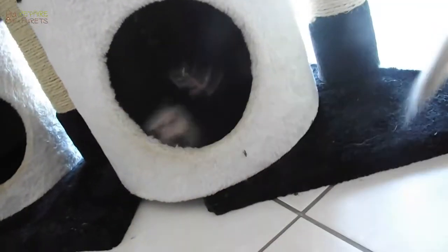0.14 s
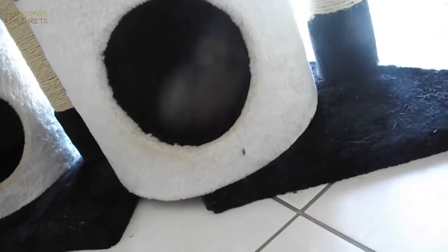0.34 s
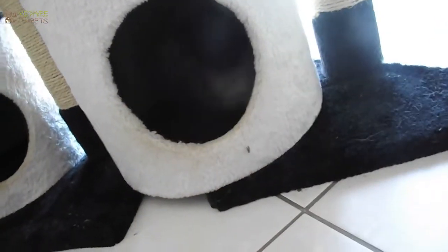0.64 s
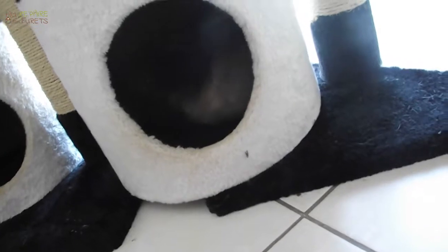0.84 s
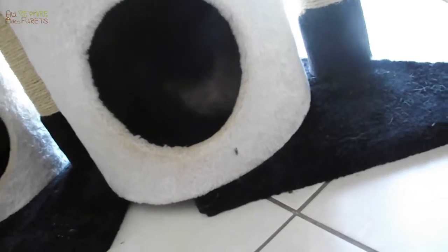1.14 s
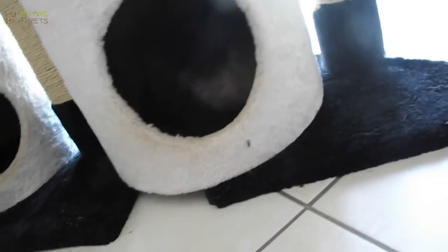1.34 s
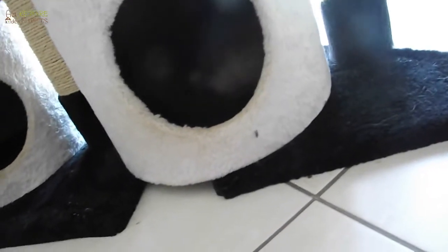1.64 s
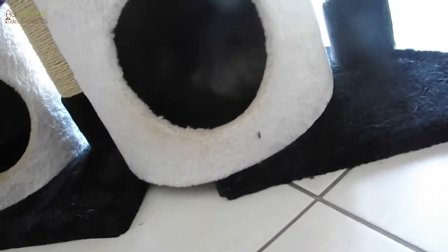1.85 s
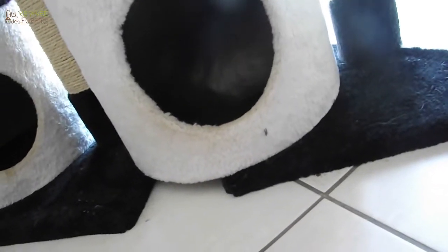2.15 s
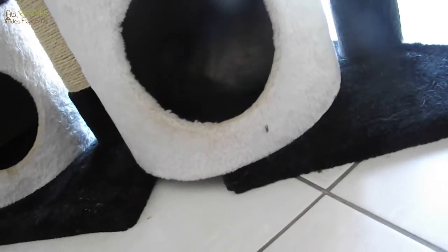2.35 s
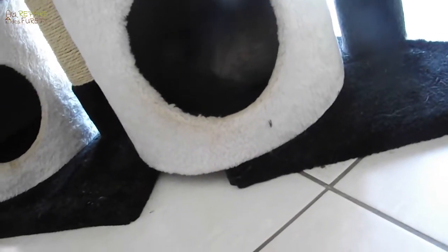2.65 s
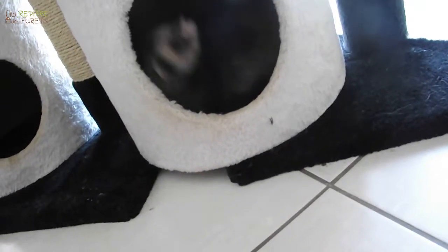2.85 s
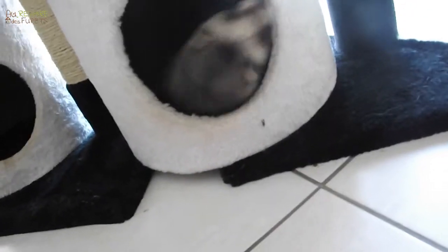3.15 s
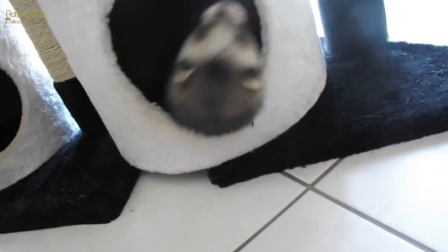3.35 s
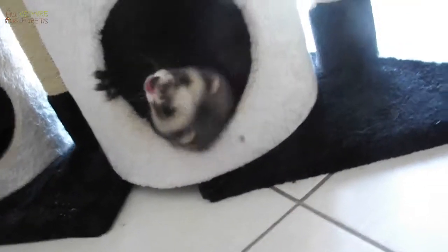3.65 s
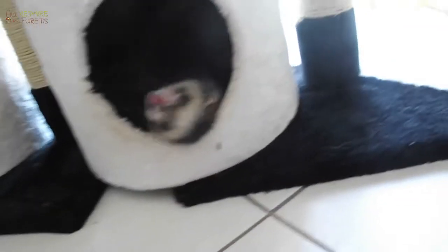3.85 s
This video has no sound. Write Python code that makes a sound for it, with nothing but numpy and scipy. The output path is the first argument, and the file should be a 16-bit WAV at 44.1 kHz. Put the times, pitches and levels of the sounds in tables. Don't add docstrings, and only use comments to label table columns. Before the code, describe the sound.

Ferret claws rake carpet inside a hollow cubby near the microphone: an early scratch, dull scuffs and small bumps, one sharp scratch, a quiet stretch, then a loud cluster of scrabbling in a hard tiled room.

```python
import sys
import numpy as np
from scipy import signal
from scipy.fft import rfft, irfft, next_fast_len
from scipy.io import wavfile
from scipy.ndimage import uniform_filter1d, map_coordinates

SR = 44100
rng = np.random.default_rng(int(sys.argv[2]) if len(sys.argv) > 2 else 0)


def unload_audio(sound):
    columns = np.transpose(np.atleast_2d(sound))
    steps = np.round(np.clip(columns, -1, 1) * 32767)
    wavfile.write(sys.argv[1], SR, steps.astype(np.int16))


def boost_factor(decibels):
    exponent = np.asarray(decibels, float) / 20
    return 10 ** exponent


N = 176400

# (time [s], peak level [dB], pitch [Hz], treble [dB], length [s])
CLAW_RAKES = [(0.177, -24, 1830, -21, 0.024), (0.218, -13, 2950, -16.5, 0.051),
              (1.46, -8, 2584, -11.5, 0.03), (3.255, -13.5, 1410, -55, 0.013),
              (3.269, -13, 2866, -31, 0.014), (3.433, -13, 1430, -29, 0.013),
              (3.439, -15.5, 2900, -26.5, 0.025), (3.548, -5.5, 1436, -26, 0.025),
              (3.565, -8, 2865, -33, 0.026), (3.811, -10, 2178, -31, .016), (3.842, -4.5, 2554, -22, 0.011),
              (3.853, -5.5, 3105, -14.5, 0.023), (3.874, -11.5, 2880, -11, 0.022),
              (3.976, -7.5, 2800, -26.5, 0.011)]
# (time [s], peak level [dB], pitch [Hz], length [s])
DULL_SCUFFS = [(0.158, -41, 1780, 0.014), (0.521, -34, 1110, 0.023), (0.625, -35.5, 850, 0.023),
               (0.717, -38.5, 1036, 0.024), (0.818, -37.5, 1000, 0.024), (0.897, -34, 1140, 0.021),
               (0.964, -35.5, 1170, 0.11), (1.105, -49.5, 1205, 0.013), (1.448, -29.5, 1445, 0.04),
               (1.762, -34, 1120, 0.029), (2.077, -35.5, 1253, .035), (2.806, -38.5, 1320, 0.056),
               (2.923, -37, 1610, 0.016), (3.034, -31.5, 1170, 0.073), (3.077, -21.5, 2580, 0.016),
               (3.238, -31.5, 1700, 0.016)]
# (pitch [Hz], width [Hz], level [dB])
CARPET_SHELL = [(583, 390, -8.5), (1575, 377, 1.5), (2910, 334, 5.5), (4200, 960, -31)]
# (pitch [Hz], width [Hz], level [dB])
RAKE_SHEEN = [(4200, 1200, 1.5), (6100, 940, 1), (7650, 1240, 1.5), (9390, 690, -1.5)]
# (frequency [Hz], level [dB per Hz])
SCRATCH_TONE = [(3000, -26), (4200, 13), (5500, 7), (7500, 4), (9500, 0), (11500, -22.5), (16000, -68.5)]
# (time [s], peak level [dB], pitch [Hz])
CLAW_TIPS = [(0.2295, -24, 2900), (0.2359, -18, 2584), (0.241, -22.5, 3000), (0.2453, -19, 2560),
             (0.2531, -20.5, 2920), (0.2578, -19, 2920), (0.264, -21, 2650), (1.4627, -22.5, 2770),
             (1.4695, -20.5, 2790), (1.4744, -21.5, 2080), (1.478, -16.5, 3100), (1.4835, -26, 2790),
             (3.0853, -23, 2450), (3.2592, -17, 1510), (3.266, -24, 1285), (3.2733, -21, 2840),
             (3.2813, -24.5, 2990), (3.4349, -17, 1457), (3.4392, -22.5, 1343), (3.4478, -17, 1277),
             (3.4599, -30.5, 1330), (3.4703, -31, 1540), (3.5497, -19.5, 1378), (3.5576, -13.5, 1460),
             (3.5656, -15, 1480), (3.5683, -15, 1503), (3.579, -18, 2850), (3.5819, -17.5, 1730),
             (3.8153, -22.5, 2300), (3.8216, -23.5, 2230), (3.8491, -7, 2490), (3.858, -12.5, 3176),
             (3.8615, -12.5, 3170), (3.8697, -15, 2300), (3.8877, -18, 2990), (3.98, -13, 3090),
             (3.9862, -21, 2970)]
# (time [s], peak level [dB], pitch [Hz])
SINGLE_TOES = [(0.5301, -42, 830), (0.5372, -41, 915), (0.6269, -33, 860), (0.6331, -35.5, 726),
               (0.6409, -31.5, 944), (0.726, -38.5, 880), (0.7328, -34.5, 1056), (0.8333, -43, 840),
               (0.8425, -36.5, 1100), (0.9054, -39.5, 1010), (0.9107, -44, 1080), (0.9462, -35.5, 802),
               (1.7709, -35, 1017), (1.7837, -34, 1150), (2.935, -30, 1620)]
# (time [s], peak level [dB])
FIBRE_TICKS = [(0.0285, -49.5), (0.0383, -60), (0.0618, -49), (0.0962, -58), (0.1234, -57.5),
               (0.1443, -70.5), (0.1585, -64), (0.3191, -52.5), (0.3502, -53), (0.3627, -58), (0.397, -61),
               (0.4282, -44), (2.525, -58.5), (2.895, -67), (2.9342, -54), (3.7313, -39), (3.9778, -33.5)]
# (time [s], peak level [dB], pitch [Hz])
PAW_THUMPS = [(0.036, -29.5, 338), (0.095, -36.5, 365), (0.178, -40.5, 217), (0.246, -38.5, 596),
              (0.32, -45.5, 178), (0.534, -45, 442), (0.625, -30.5, 347), (0.729, -40, 282),
              (0.828, -39, 325), (0.898, -40, 300), (1.476, -30.5, 189), (1.768, -45.5, 164.4),
              (1.878, -33.5, 197), (1.925, -43, 650), (2.0, -47, 593), (2.686, -57, 687), (2.931, -40, 185),
              (3.263, -31.5, 238), (3.445, -33.5, 216), (3.547, -22, 690), (3.657, -31, 340),
              (3.747, -35.5, 341), (3.813, -22.5, 339.4), (3.887, -28.5, 600)]
# (time [s], peak level [dB], pitch [Hz])
MORE_THUMPS = [
    (0.102, -43.5, 62.7),
    (3.591, -38.5, 157),
]
# (time [s], level [dB])
FLANK_RUB = [
    (3.59, -36.5),
    (3.65, -32),
    (3.69, -35.5),
    (3.72, -44),
    (3.79, -48),
]
# (frequency [Hz], level [dB per Hz])
FUR_TONE = [(400, -11.5), (1300, -13), (2800, -1.5), (4500, -13), (7500, -27), (9800, -31), (12500, -95)]
# (time [s], peak level [dB], width [s], treble [dB], direction [+1 or -1])
CAMERA_KNOCKS = [
    (0.5237, -28, 0.00091, -26, 1),
    (0.6287, -27.5, 0.0006, -49, 1),
    (0.9527, -26.5, 0.0014, -23, -1),
]
# (frequency [Hz], level [dB per Hz])
AIR_TONE = [(3500, -43), (4800, 3), (6600, -17), (8500, 3.5), (11000, -4), (13000, -37)]
# (time [s], peak level [dB], pitch [Hz], length [s])
FIBRE_SQUEAKS = [(0.11, -55, 4540, .008), (0.111, -38.5, 2980, .01), (.235, -26, 4120, .03),
                 (0.423, -44.5, 6650, 0.005), (1.009, -36.5, 4200, 0.019), (1.058, -49, 3124, 0.037),
                 (1.798, -33, 3510, .035), (1.875, -42.5, 4200, 0.017), (2.084, -45, 4230, 0.012),
                 (2.078, -39.5, 2406, .03), (2.205, -57.5, 4200, .03), (2.31, -47.5, 4700, 0.099),
                 (2.518, -54, 4900, 0.018), (2.704, -64, 5070, 0.022), (2.826, -31, 3300, 0.013),
                 (2.833, -45.5, 3820, .012), (2.924, -47.5, 4200, .01), (3.089, -31.5, 2980, .012),
                 (3.716, -33, 3257, 0.015)]
# (time [s], peak level [dB], pitch [Hz])
FAR_TAPS = [
    (2.207, -49, 1190),
    (2.402, -58, 1250),
    (2.505, -43.5, 1754),
    (2.62, -51.5, 1700),
    (2.6974, -50, 1760),
]
# (time [s], pitch [Hz], level [dB])
POST_CREAKS = [
    [(2.09, 561, -60.5), (2.19, 583, -54.5), (2.275, 570, -70.5), (2.31, 573, -54.5), (2.365, 567, -70),
     (2.39, 560, -53), (2.42, 542, -76), (2.46, 531, -58.5), (2.53, 527, -90)],
    [(2.74, 563, -84), (2.85, 530, -58), (2.97, 564, -64)],
]
# (time [s], rustle level [dB], fizz level [dB], rumble level [dB])
FLOOR_STIR = [(0, -50.5, -57.5, -59.5), (.2, -59.5, -76.5, -53), (.45, -64, -85, -79),
              (1.0, -58, -117.5, -65), (1.3, -87.5, -100, -78.5), (1.6, -60, -75.5, -60.5),
              (2.0, -61.5, -79, -62), (2.5, -75, -84.5, -65), (3.0, -65, -72, -55.5),
              (3.45, -47, -61.5, -56.5), (4.0, -44.5, -47.5, -61.5)]
# (frequency [Hz], level [dB per Hz])
RUSTLE_TONE = [(80, -42.5), (170, 1), (420, -14.5), (600, -0.5), (950, -22.5), (1400, -7.5), (2600, -1.5),
               (3700, -45.5)]
# (frequency [Hz], level [dB per Hz])
FIZZ_TONE = [(2300, -52), (3200, -1), (4600, -16.5), (5600, -46.5), (11000, -82.5)]
# (frequency [Hz], level [dB per Hz])
RUMBLE_TONE = [(15, 5), (30, 5.5), (64, -1), (100, -16), (300, -110)]
# (frequency [Hz], time to fall 60 dB [s])
ROOM_RING = [(150, 0.46), (600, 0.34), (2500, 0.41), (6000, 0.42), (12000, 0.22)]
# (pitch [Hz], level [dB])
CAMERA_WHINE = [(15692, -90)]

ROOM_DB, BODY_DB, HISS_DB = -10.5, 6.5, -102
AIR_DB, AIR_T60_S = -22, 0.38
FLICKER_HZ = 59.94


def claws():
    shell, sheen = resonant(CARPET_SHELL), resonant(RAKE_SHEEN)
    s, db, hz, treble_db, length = np.transpose(CLAW_RAKES)
    ring = grains(s, db - 10.5, hz, length, spread=0.075, cycles=6.06, scatter_db=0, count=12, peak=0.23)
    scratch = snaps(s, db + treble_db - 11, 1.3 * length, count=400)
    bright = filtered(scratch, lambda f: boost_factor(along(SCRATCH_TONE, f)) * sheen(f))
    body = snaps(s, db + BODY_DB - 5.5, length, count=90)
    hard = filtered(body, lambda f: shell(f) / (1 + (f / 4800) ** 6))

    s, db, hz, length = np.transpose(DULL_SCUFFS)
    dull = filtered(snaps(s, db + 1.5, length, count=40), shell)
    dull = dull + grains(s, db - 3.5, hz, length, spread=0.11, cycles=5.0, scatter_db=3, count=12)
    muffled = filtered(dull, lambda f: 1 / (1 + (f / 2900) ** 10))
    return ring + hard + bright + muffled


def catches():
    s, db, hz = np.transpose(CLAW_TIPS)
    tips = grains(s, db + 8, hz, 0, spread=0, cycles=4.15, scatter_db=-1, count=1, peak=.001)
    s, db, hz = np.transpose(SINGLE_TOES)
    toes = grains(s, db + 8, hz, 0, spread=0, cycles=2.03, scatter_db=0.5, count=1, peak=.001)
    s, db = np.transpose(FIBRE_TICKS)
    ticks = snaps(s, db + 8, np.full(len(s), .0015), count=6)
    return tips + toes + filtered(ticks, resonant([(3300, 1200, -2), (6600, 2600, -0.5)]))


def paws():
    s, db, hz = np.transpose(list(PAW_THUMPS) + list(MORE_THUMPS))
    return grains(s, db + 3.5, hz, 0.01551, spread=0.053, cycles=1.87, scatter_db=0.0, count=4, peak=0.065)


def rub():
    db, = curves(FLANK_RUB)
    gate = fade_gate(3.57, 3.81, 0.028)
    grain_db = 3 * wobble(60) + 3.5 * wobble(300)
    return gate * boost_factor(db - 4 + grain_db) * rush(FUR_TONE, patchy_db=3)


def knocks():
    t, x = np.arange(N) / SR, np.zeros(N)
    scratch, air = rush(SCRATCH_TONE, patchy_db=0), rush(AIR_TONE, patchy_db=1)
    for s, db, width, treble_db, direction in CAMERA_KNOCKS:
        d = t - s
        away = np.abs(d)
        push = 1.26 * np.sign(direction) * np.tanh(d / 0.00016) * np.exp(-away / width)
        sway = 0.046 * np.sin(2 * np.pi * 55 * d) * (d > 0) * np.exp(-away / 0.037)
        x += boost_factor(db) * (push + sway)
        x += boost_factor(db + treble_db - 10) * scratch * np.exp(-away / 0.00091)
        x += boost_factor(db + treble_db + AIR_DB - 60 * away / AIR_T60_S) * air * (d > -.008)
    return x


def squeaks():
    s, db, hz, length = np.transpose(FIBRE_SQUEAKS)
    high = grains(s, db - 9, hz, 1.5 * length, spread=.03, cycles=15, scatter_db=3, count=30, peak=.4)
    s, db, hz = np.transpose(FAR_TAPS)
    return high + grains(s, db - 6, hz, .05, spread=.03, cycles=12, scatter_db=3, count=8)


def creak():
    x = np.zeros(N)
    for rows in POST_CREAKS:
        hz, db = curves(rows)
        gate = fade_gate(rows[0][0], rows[-1][0], .02)
        unsteady = 1.1 + .45 * wobble(35) + .45j * wobble(35)
        turning = np.exp(2j * np.pi * np.cumsum(hz) / SR)
        x += gate * boost_factor(db) * np.real(unsteady * turning)
    return x


def room(x):
    out, step = np.zeros(N + 2 * SR), SR // 4
    for a in range(0, N, step):
        hz, t, z = signal.stft(rng.standard_normal(SR), SR, nperseg=256)
        fade = boost_factor(-60 * t / along(ROOM_RING, hz)[:, None])
        tail = signal.istft(z * fade, SR, nperseg=256)[1][:SR]
        wet = signal.fftconvolve(x[a:a + step], tail / np.linalg.norm(tail))
        out[a + 300:][:len(wet)] += wet
    return out[:N]


def floor():
    rustle_db, fizz_db, rumble_db = curves(FLOOR_STIR)
    rustle = boost_factor(rustle_db + 1.5 * wobble(14)) * rush(RUSTLE_TONE, patchy_db=3)
    fizz = boost_factor(fizz_db + 2.5 * wobble(14) + 3 * wobble(150)) * rush(FIZZ_TONE, patchy_db=3)
    rumble = boost_factor(rumble_db + 3.5 * wobble(10)) * rush(RUMBLE_TONE, patchy_db=0)
    return rustle + fizz + rumble + boost_factor(HISS_DB) * rng.standard_normal(N)


def whine():
    (hz, db), = CAMERA_WHINE
    t = np.arange(N) / SR
    frame = (t * FLICKER_HZ + .71).astype(int)
    skip = rng.standard_normal((2, 300))[:, frame]
    level = np.sqrt(2) * boost_factor(db + 3 + 3.5 * skip[0])
    tone = level * np.sin(2 * np.pi * hz * t + 1.1 * skip[1])
    return filtered(tone, lambda f: f < 15850)


def grains(s, db, hz, length, spread, cycles, scatter_db, count, peak=0.37):
    u = (np.arange(count) + rng.random((len(s), count))) / count
    g = rng.standard_normal((len(s), count, 2))
    start = (s[:, None] + np.abs(length)[..., None] * u).reshape(-1, 1)
    pitch = np.clip(hz[:, None] * np.exp(spread * g[..., 0]), 60, 15000).reshape(-1, 1)
    size = boost_factor(db[:, None] + scatter_db * g[..., 1] + swell(u, peak, 6.3)).reshape(-1, 1)
    t = np.arange(2048) / SR
    decay = np.exp(-t * pitch / cycles)
    attack = (1 - np.exp(-t * pitch / (0.25 * cycles))) ** 2
    wave = size * np.sin(2 * np.pi * pitch * t) * decay * attack
    at = np.round(start * SR).astype(int) + np.arange(2048)
    return np.bincount(at.ravel(), wave.ravel(), N + SR)[:N]


def snaps(s, db, length, count):
    u, g = rng.random((len(s), count)), rng.standard_normal((len(s), count))
    at = np.round((s[:, None] + np.abs(length)[:, None] * u) * SR).astype(int)
    clicks = boost_factor(db[:, None] + swell(u, .3, 12)) * g
    return np.bincount(at.ravel(), clicks.ravel(), N + SR)[:N]


def swell(u, peak, fall_db):
    return np.where(u < peak, -16 * (1 - u / peak), -fall_db * (u - peak))


def rush(spectrum, patchy_db):
    z = signal.stft(rng.standard_normal(N), nperseg=512)[2]
    field = uniform_filter1d(rng.standard_normal(z.shape), size=4, axis=0)
    field = uniform_filter1d(field, size=10, axis=1)
    x = signal.istft(z * boost_factor(patchy_db * unit(field)), nperseg=512)[1][:N]
    return unit(filtered(x, lambda hz: boost_factor(along(spectrum, hz))))


def resonant(peaks):
    def response(f):
        total = 0
        for k, (center, width, db) in enumerate(peaks):
            damping = 1j * f * width
            total = total + (-1) ** k * boost_factor(db) * damping / (center * center - f * f + damping)
        return total
    return response


def filtered(x, response):
    m = next_fast_len(N + SR // 2)
    return irfft(rfft(x, m) * response(np.fft.rfftfreq(m, 1 / SR)), m)[:N]


def fade_gate(start, end, fade):
    t = np.arange(N) / SR
    return np.clip(np.minimum(t - start, end - t) / fade, 0, 1)


def wobble(rate):
    return map_coordinates(rng.standard_normal(int(N * rate / SR) + 4), [np.arange(N) * rate / SR])


def curves(rows):
    s, *cols = np.transpose(rows)
    return [np.interp(np.arange(N) / SR, s, c) for c in cols]


def along(points, hz):
    f, v = np.transpose(points)
    return np.interp(np.log(hz + 1), np.log(f + 1), v)


def unit(x):
    return x / np.sqrt(np.mean(x ** 2) + 1e-20)


def scene():
    near = claws() + catches() + rub() + knocks()
    thin, low = squeaks(), paws()
    echoes = boost_factor(ROOM_DB) * room(near + boost_factor(-2.0) * thin + boost_factor(0.5) * low)
    return (near + thin + low + echoes + creak() + floor() + whine())[None]


def roll_off(x):
    return signal.sosfilt(signal.butter(12, 15870, fs=SR, output="sos"), x)


def record(dry):
    return roll_off(dry)


dry = scene()
out = record(dry)
unload_audio(out)
```